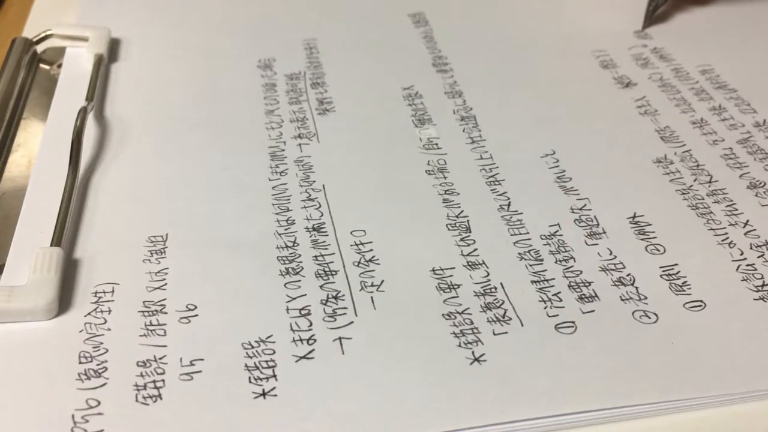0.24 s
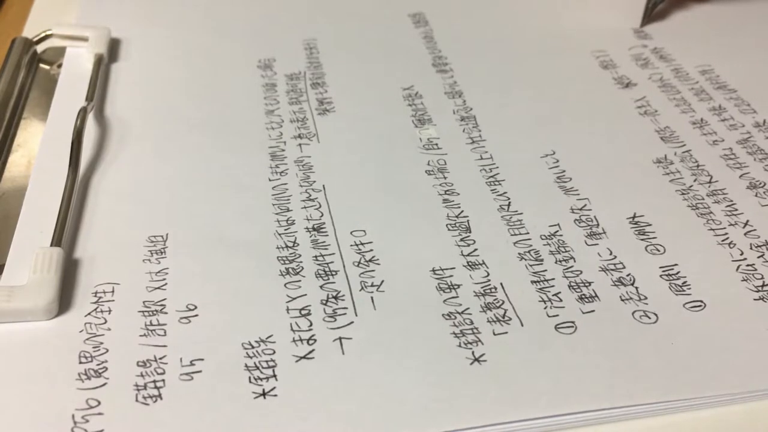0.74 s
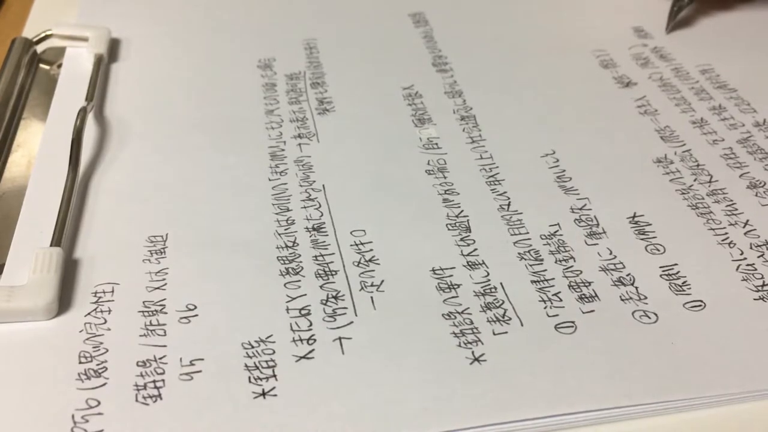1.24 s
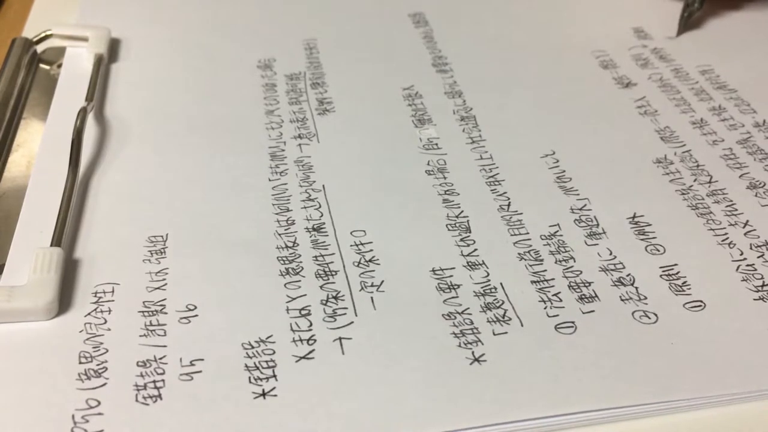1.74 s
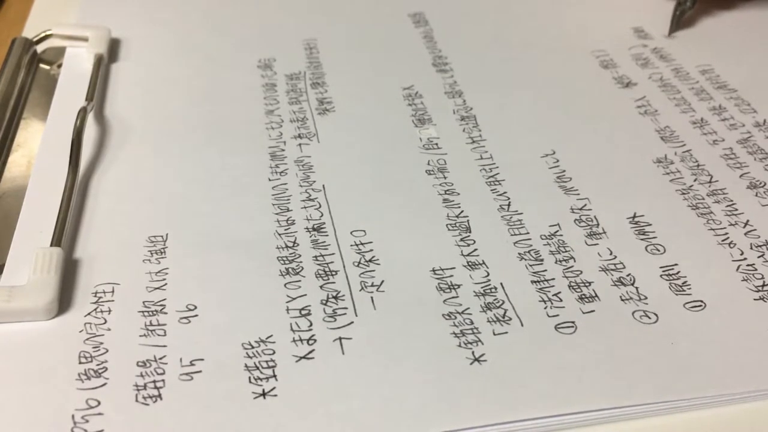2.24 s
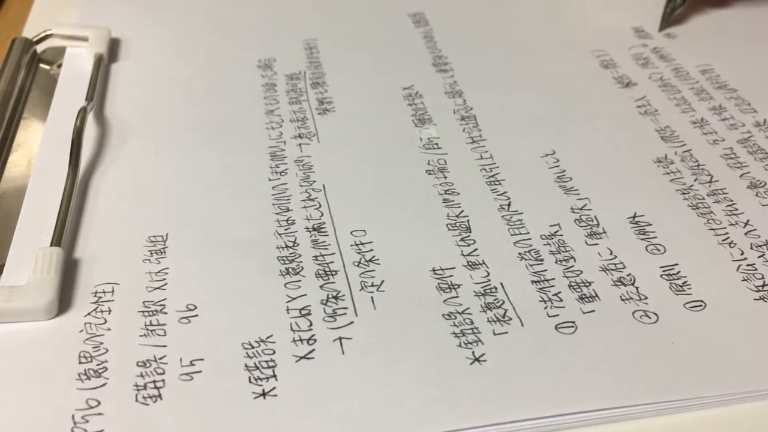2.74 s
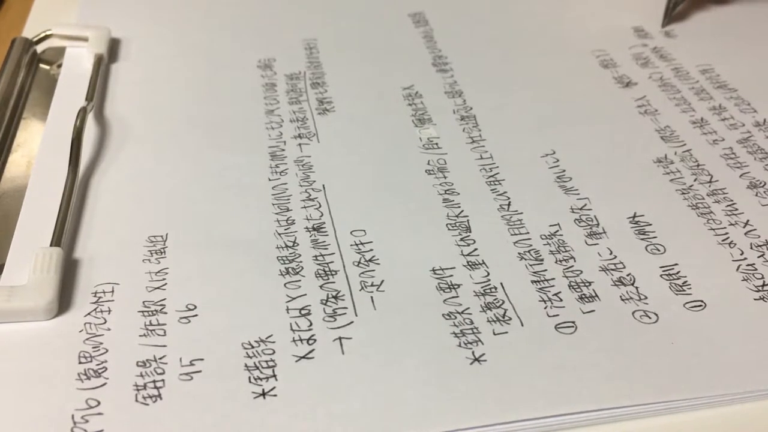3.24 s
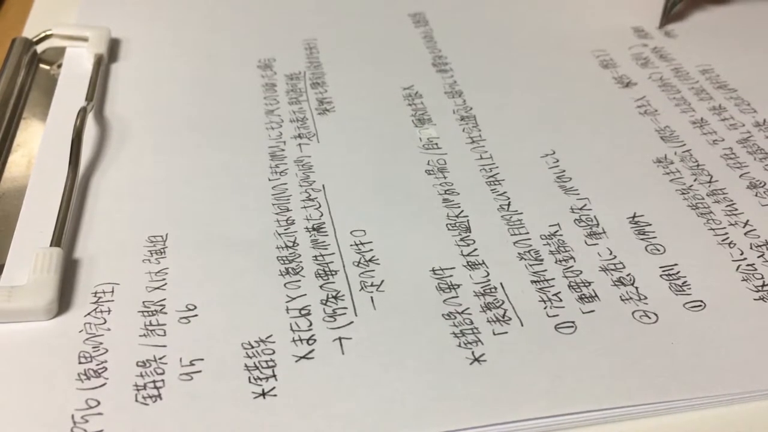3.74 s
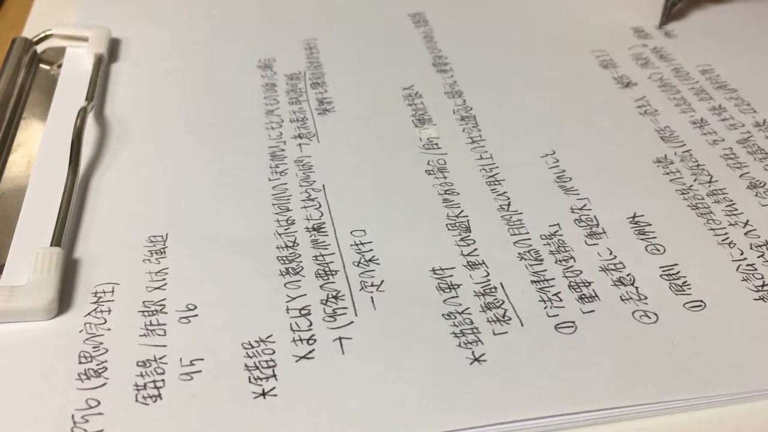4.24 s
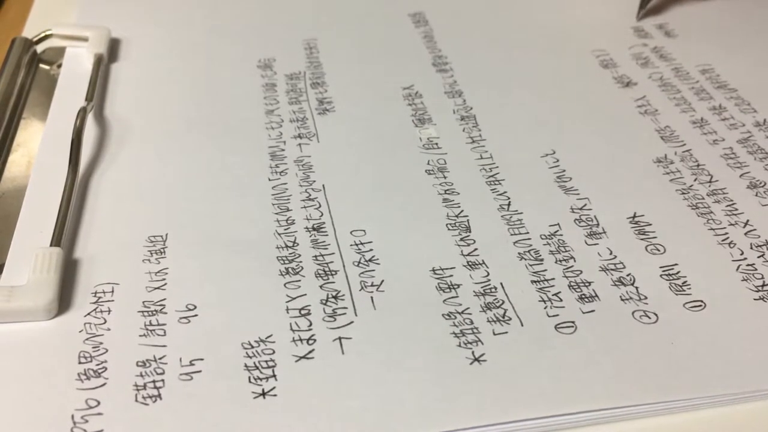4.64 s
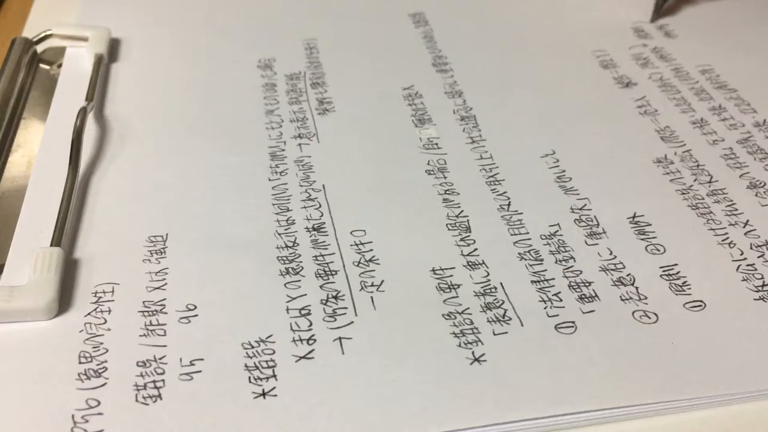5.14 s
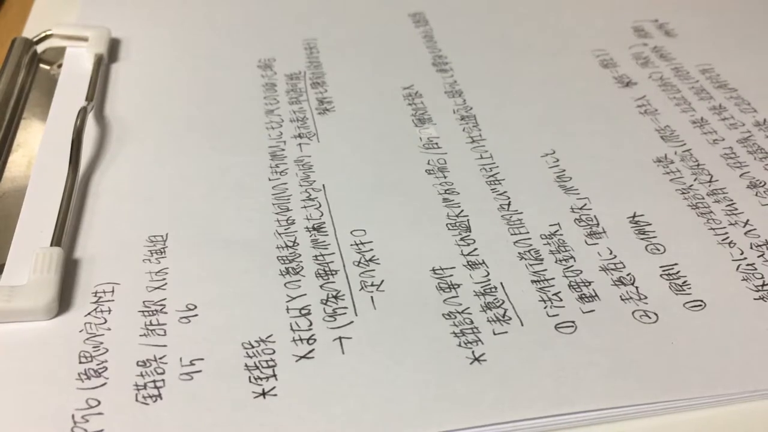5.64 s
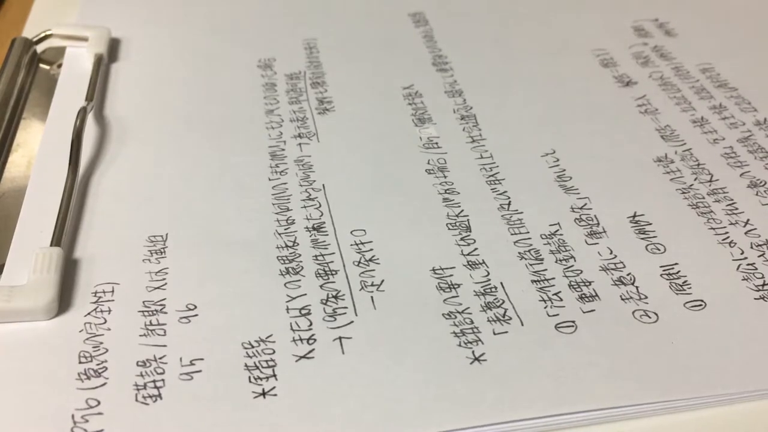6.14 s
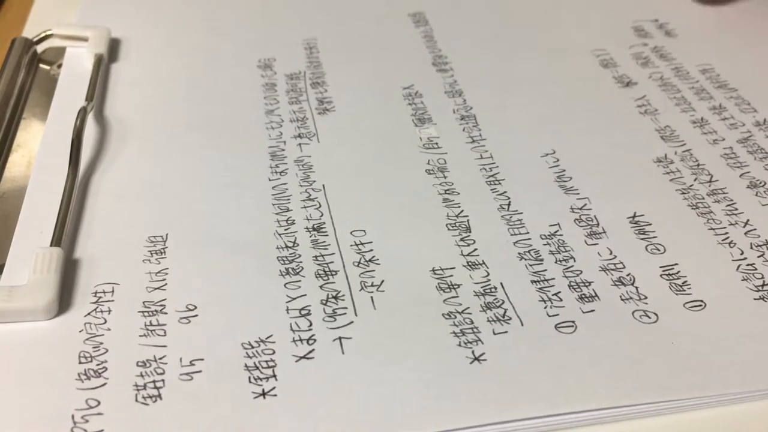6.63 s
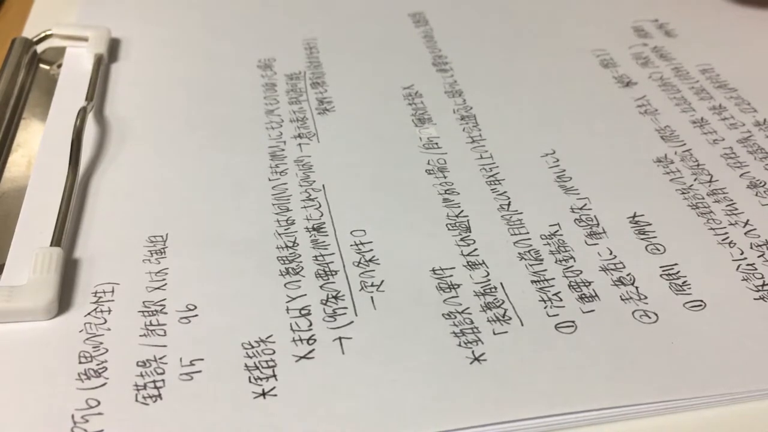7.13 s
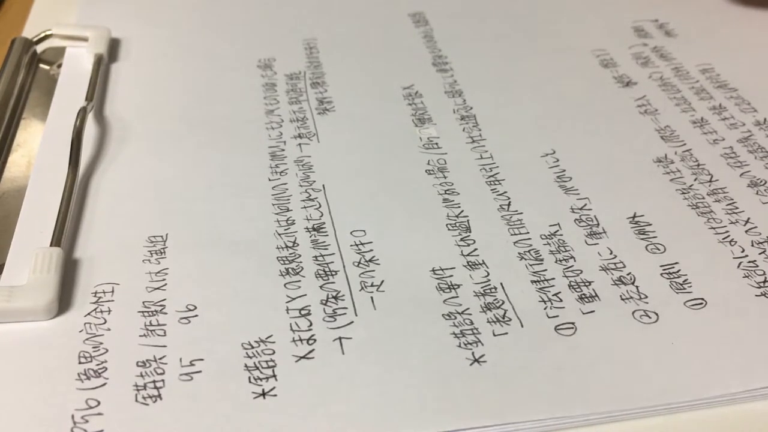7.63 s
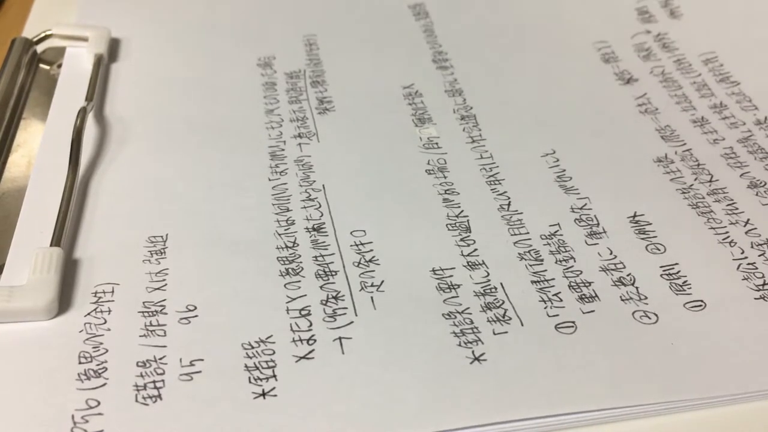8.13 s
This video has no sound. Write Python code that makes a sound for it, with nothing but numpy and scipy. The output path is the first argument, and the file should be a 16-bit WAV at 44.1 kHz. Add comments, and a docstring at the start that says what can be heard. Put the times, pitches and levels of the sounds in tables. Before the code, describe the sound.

From about 0.5 seconds a pen nib writes on a pad of paper in short, soft, dry scratches, roughly three or four a second, with little ticks as it lands. The nib judders very briefly near 1 second and again near 4.9. The writing ends around 5.3 seconds, followed by a few light clicks and faint rubs of a hand on the page until about 6.7. The sheet then starts sliding softly, crackles from around 7.3 and buckles with a sharp snap at about 7.7 seconds, the loudest moment. Sliding and rustling grow stronger through to the end at about 8.4, with smaller snaps near 8.0 and 8.2, a brief edge scrape and faint bumps of the pad on the desk. Everything is close, heard from a small microphone on the desk in a quiet, small room with faint steady hiss and electrical hum.

```python
"""Short, close scratches of a fountain pen on a pad, with little ticks as the nib lands. Then a hand
shifts on the sheet, which slides, rustles, crackles and snaps. A quiet room hisses over a mains hum.
Paper fibres catch and let go, and their tiny slips ring the pad, the nib and the sheet. Twice the tines
judder, sticking and slipping; the snaps are the sheet buckling. It is all heard from a small microphone
lying on the desk, whose reflection notches the treble."""
import sys
import numpy as np
from scipy import signal
from scipy.fft import rfft, irfft, next_fast_len
from scipy.io import wavfile
from scipy.ndimage import uniform_filter1d, map_coordinates

SR = 44100
rng = np.random.default_rng(int(sys.argv[2]) if len(sys.argv) > 2 else 0)


def master(y):
    """Save y as 16-bit WAV."""
    cut = np.clip(np.atleast_2d(y).T, -1, 1)
    pcm = np.round(cut * 32767)  # scale
    wavfile.write(sys.argv[1], SR, pcm.astype(np.int16))


N = 369558

# Strokes pulled along the nib slit, each at its own angle. Each row: start and length in seconds,
# level in dB, then middle ring, upper ring and treble in dB relative to that level.
PULLED_STROKES = [(0.537, 0.072, -49.5, -2, -1.5, -20), (.75, 0.082, -43.5, 0, -0.5, -13),
                  (1.512, 0.09, -49.5, -10, 0.5, -9), (1.739, 0.085, -44, -1.5, 1, -13.5),
                  (2.204, 0.067, -48, -8, -2, -12.5), (2.412, 0.084, -47.5, -9, -3.5, -13),
                  (2.636, 0.064, -52.5, -0.5, 2.5, -11.5), (2.842, .1, -42.5, -1.5, 0, -13),
                  (3.094, 0.05, -55, 1, 1, -8), (3.439, 0.078, -48.5, -12, -1.5, -12.5),
                  (3.617, 0.11, -49, -2, -2, -13), (3.868, .072, -50, 1.5, 1, -12),
                  (4.079, .11, -42, -1.5, 1.5, -12.5), (4.33, 0.058, -52.5, 1.5, 5.5, -6),
                  (4.853, .13, -40.5, -2.5, -1.5, -12), (5.221, 0.062, -47, 0.5, -1, -12)]
# Thinner strokes across the slit. Each row: start and length in seconds, level and treble offset in dB.
SIDE_STROKES = [(.905, 0.16, -50.5, -9.5), (3.155, 0.09, -52, -3), (4.435, 0.11, -49.5, -6)]
# Juddering tines. Each row: start and length in seconds, slips per second, level in dB.
TINE_JUDDERS = [(.9822, .09, 172, -38), (4.9135, .03, 212, -30)]
# The nib landing. Each row: time in seconds, level in dB.
NIB_TICKS = [(0.4883, -44), (0.6942, -41.5), (1.9736, -41.5), (2.8045, -43), (3.8279, -48), (4.036, -46),
             (4.2833, -46), (4.343, -48), (4.572, -50), (5.16, -48), (5.4071, -36.5), (5.499, -39),
             (6.1778, -39), (6.5555, -38), (6.7314, -49)]
# The sheet sliding over the pad. Each row: time in seconds, level and low drag offset in dB.
SLIDE_CURVE = [(6.5, -90, 17), (6.75, -59, -5), (7.0, -56, -10.5), (7.3, -54, -22), (7.5, -58, -3),
               (7.58, -63.5, -33), (7.7, -47.5, -34), (7.8, -46.5, -21), (7.87, -43.5, -40),
               (7.98, -47, -41), (8.05, -43, -46), (8.2, -43.5, -12), (8.31, -34.5, -27),
               (8.38, -40.5, -38)]
# The sheet bending. Each row: start, attack and length in seconds, level and treble offset in dB.
SHEET_RUSTLES = [(6.76, 0.017, 0.072, -56, -7.5), (6.88, .012, 0.045, -52.5, -8),
                 (6.965, .008, 0.027, -60, 1), (7.4, 0.0066, 0.017, -42, -14),
                 (7.45, .006, 0.05, -46.5, -11), (7.503, 0.0069, 0.044, -49.5, -1),
                 (7.533, .008, 0.06, -52.5, 1), (7.599, 0.0045, 0.03, -46, -6),
                 (7.636, 0.013, .03, -41.5, 0), (7.652, 0.007, 0.026, -32, -7.5),
                 (7.875, 0.039, 0.09, -38, -3), (7.993, .003, .077, -34.5, -10),
                 (8.085, 0.028, 0.059, -37, -8.5), (8.187, .004, 0.062, -35.5, -4.5),
                 (8.255, 0.018, 0.048, -38.5, -22), (8.29, .03, 0.059, -33, -15)]
# An edge dragging on the desk. Each row: start and length in seconds, level in dB.
EDGE_SCRAPES = [(8.164, 0.029, -34.5), (8.183, 0.049, -39)]
# The sheet crackling. Each row: time in seconds, body level and treble level in dB.
SHEET_CRACKLES = [(6.981, -36, -52), (7.2805, -41, -43), (7.3272, -35.5, -40), (7.3588, -35.5, -55),
                  (7.3863, -25, -38), (7.4285, -44, -48), (7.4385, -24.5, -51), (7.4462, -27, -48),
                  (7.458, -36, -49), (7.4798, -36, -42), (7.488, -38, -47), (7.8813, -37, -39),
                  (7.995, -31, -40), (8.17, -25, -46), (8.186, -25, -47)]
# The sheet buckling. Each row: time in seconds, level in dB, pitch in Hz, ring time in seconds.
SHEET_SNAPS = [(7.6569, -6, 2533, 0.00342), (7.665, -19, 3280, 0.0032), (8.0323, -15.5, 2500, 0.0029),
               (8.0352, -10.5, 2000, 0.0029), (8.038, -21.5, 2320, 0.0045), (8.202, -23, 2410, 0.0046)]
# The hand shifting on the sheet. Each row: start and length in seconds, level in dB.
HAND_SHIFTS = [(.33, 0.047, -61), (2.02, 0.065, -59), (2.293, 0.04, -55.5), (5.3, 0.05, -56.5),
               (5.47, 0.12, -59.5), (5.92, 0.075, -56.5), (6.22, 0.11, -58), (6.47, 0.11, -62.5),
               (6.59, 0.052, -59), (6.66, 0.02, -46.5)]
# The pad bumping the desk. Each row: time in seconds, level in dB.
PAD_THUDS = [(7.654, -50.5), (8.167, -55), (8.186, -53)]

# Resonances that colour each sound. Each row: centre in Hz, width in Hz, gain in dB.
PAD_MODES = [(377, 60, -6.5), (701.5, 24, 0), (1147, 380, -8.5), (1785, 255, 3.5)]  # the pad under the nib
MIDDLE_MODES = [(2328, 290, -2.5)]  # middle ring of a pulled stroke
NIB_MODES = [(2733, 155, -4), (3200, 118, 0.5), (3420, 1190, -12.5)]  # its upper ring
GLINT_MODES = [(5230, 1850, 3.5), (6530, 490, 10), (8500, 1800, 5), (11800, 2800, 6.5), (12600, 600, 4),
               (14400, 1700, -4)]  # its treble
TINE_MODES = [(1290, 910, 2), (2310, 320, 17), (4140, 950, 1)]  # the nib rubbed sideways
AIRY_MODES = [(5070, 600, -3.5), (7200, 1400, -6.5), (8650, 1800, -7.5), (12100, 2700, -13),
              (14500, 2500, -17)]  # treble of a sideways stroke
PAPER_MODES = [(664, 1200, -17.5), (1680, 980, -6.5), (2376, 493, 2.5), (3890, 1090, -7)]  # body of the sheet
FIBRE_MODES = [(5790, 1280, 3), (8930, 1850, -2.5), (10700, 3400, -6), (15000, 2300, -12)]  # treble of rubbed paper
DRAG_MODES = [(457, 280, -17.5), (1480, 360, -16)]  # low end of the slide
EDGE_MODES = [(558, 130, -0.5), (1230, 200, 0)]  # the scraping edge
DESK_MODES = [(168, 170, -5), (385, 270, -4)]  # the bumped desk

# Tone of the room's hiss. Each row: frequency in Hz, relative spectral density in dB.
HISS_SPECTRUM = [(60, -37), (85, -15.5), (150, -21.5), (237, -15.5), (320, -23.5), (380, -18), (672, -9),
                 (1000, -7), (1600, -6), (2400, -0.5), (3100, -6), (6000, -11), (13000, -18),
                 (16000, -28.5)]
# Tone of its rumble. Each row: frequency in Hz, relative spectral density in dB.
RUMBLE_SPECTRUM = [(20, -18), (32, -9), (42, 21), (52, -10), (66, -27), (72, -56)]
# Hum tones. Each row: frequency in Hz, rms level in dB.
HUM_TONES = [(59.5, -73), (231.5, -93.5), (976, -80)]
# Notches cut by the desk reflection. Each row: centre in Hz, width in Hz, depth from 0 to 1.
DESK_NOTCHES = [(4790, 230, 0.28), (7610, 390, 0.4), (10500, 340, 0.55)]


def pen_strokes():
    """Pulled strokes shake pad and nib, whose treble glints briefly; sideways ones rub the tines."""
    start, length, db, middle_db, ring_db, glint_db = np.transpose(PULLED_STROKES)
    attack, release = 0.016, 0.024 + 0.3 * length
    swell = 150  # pressure keeps growing until the nib lifts
    ring_power, glint_power = 0.85, 1.06  # the upper ring follows pressure gently, the treble steeply
    pad, middle = swells(np.c_[start, length, db, middle_db], attack, release,
                         0.64, 1.64, swell / ring_power)
    nib, = swells(np.c_[start, length, db + ring_db], attack, release, 1.0, 1.95, ring_power * swell)
    glints, = swells(np.c_[start, length, db + glint_db], glint_power * attack, release,
                     glint_power, 2.2 * glint_power, glint_power * swell)
    force = slips(6000, 1.5, 1.3, 180) * amp(0.67 * wobble(60))
    bright = filtered(patchy(force, 2.6), modes(GLINT_MODES))  # rung again below: dark between glints
    dull = filtered(patchy(force, 2.0), lambda hz: 1 / (1 + (hz / 5500) ** 2))
    pulled = resonate(dull, [pad, middle, nib], [PAD_MODES, MIDDLE_MODES, NIB_MODES])
    pulled += resonate(bright, [glints], [GLINT_MODES])
    sideways = swells(SIDE_STROKES, 0.024, 0.064, 0.35, 0.77, swell_db_per_s=84)
    return pulled + resonate(slips(8000, 2.0, 0.68, 170), sideways, [TINE_MODES, AIRY_MODES])


def tine_judder():
    """Almost regular slips pluck the tines, weakening as the nib runs free."""
    plucks, count = np.zeros(N + SR), np.arange(20)
    for start, length, rate, db in TINE_JUDDERS:
        jitter, size = rng.standard_normal((2, 20))
        t = (count + 0.066 * jitter * (count > 0)) / rate
        fade = np.clip(1 - t / length, 0, 1)
        plucks[np.round((start + t) * SR).astype(int)] += amp(db + 2.5 * size) * fade
    tine = modes(TINE_MODES[1:2])  # only the strongest mode rings
    one_pluck = filtered(np.eye(1, N)[0], tine)
    return filtered(plucks[:N], tine) / np.abs(one_pluck).max()


def ticks_and_crackles():
    """Each nib tick or paper crackle is a blow of a millisecond or two on the sheet and the pad."""
    out, t = np.zeros(N + SR), np.arange(2048) / SR
    hz = np.fft.rfftfreq(len(t), 1 / SR)
    body = modes(PAPER_MODES[1:])(hz) + amp(-3.0) * modes(PAD_MODES[3:] + MIDDLE_MODES)(hz)
    treble = modes(FIBRE_MODES)(hz)
    ticks = [(*row, -68) for row in NIB_TICKS]  # only a faint treble on the ticks
    for start, db, treble_db in ticks + SHEET_CRACKLES:
        blow = rfft(t * amp(-60 * t / 0.005) * rng.standard_normal(len(t)))
        low, high = irfft(blow * body), irfft(blow * treble)
        click = amp(db) * low / np.abs(low).max() + amp(treble_db) * high / np.abs(high).max()
        out[round(start * SR):][:len(t)] += click
    return out[:N]


def sheet_moves():
    """The sheet slides evenly, crinkles in clumps when it bends, and drags an edge."""
    times, level_db, drag_db = np.transpose(SLIDE_CURVE)
    slide, drag = (amp(np.interp(np.arange(N) / SR, times, db, left=-150))
                   for db in (level_db, level_db + drag_db))
    friction = patchy(slips(9000, 0.28, 0.84, 40), 0.89)
    sliding = resonate(friction, [slide, slide * amp(-6.5), drag], [PAPER_MODES, FIBRE_MODES, DRAG_MODES])
    crinkle = patchy(slips(4500, 1.3, 2.5, 120), 3.2)
    attacks = np.array(SHEET_RUSTLES)[:, 1]
    bends = swells(np.delete(SHEET_RUSTLES, 1, axis=1), attacks, 0.022, 0.6, 0.74)
    rustling = resonate(crinkle, bends, [PAPER_MODES, FIBRE_MODES])
    scrapes = swells(EDGE_SCRAPES, 0.014, 0.018, 0.97, 1.7)
    return sliding + rustling + resonate(slips(3200, 5.0, 2.4, 77), scrapes, [EDGE_MODES])


def sheet_snaps():
    """A buckle rings for a few cycles until the sheet chokes it; a bright crack leads."""
    out, t = np.zeros(N + SR), np.arange(SR // 50) / SR
    chatter = sum(gain * np.cos(2 * np.pi * hz * t) for hz, gain in [(6200, 1), (4000, 1.7), (10500, 0.096)])
    chatter *= amp(-60 * t / 0.0027)
    for start, db, pitch_hz, ring_s in SHEET_SNAPS:
        choke = np.abs(np.sin(np.pi * np.clip(t / ring_s, 0, 1) ** 0.8)) ** 0.55
        tone = np.sin(2 * np.pi * pitch_hz * t) * choke
        burst = t * rng.standard_normal(len(t)) * amp(-60 * t / 0.0035)
        crack = np.convolve(burst, chatter)[:len(t)]
        crack_db = -12.5 + 0.82 * (db + 19.5)  # louder snaps have more bite
        out[round(start * SR):][:len(t)] += amp(db) * (tone + amp(crack_db) * crack / np.abs(crack).max())
    return filtered(out[:N], lambda hz: (1j * hz / (1300 + 1j * hz)) ** 2)  # a small spot has little body


def hand_rubs():
    """Skin on paper: soft, fine rubs."""
    rub, = swells(HAND_SHIFTS, 0.023, 0.047, 0.72, 0.78)
    return resonate(slips(9000, 2.9, 0.84, 60), [rub, rub * amp(-6.5)], [PAPER_MODES, FIBRE_MODES])


def pad_thuds():
    """Soft bumps of the pad send a low puff through the desk."""
    t, blows = np.arange(SR // 20) / SR, np.zeros(N + SR)
    for start, db in PAD_THUDS:
        puff = t * amp(-60 * t / 0.0097) * rng.standard_normal(len(t))
        blows[round(start * SR):][:len(t)] += amp(db) * unit(puff)
    return filtered(blows[:N], modes(DESK_MODES))


def room_echo(x, decay_s):
    """The small room answers with a short noisy tail."""
    t = np.arange(SR // 3) / SR
    tail = rng.standard_normal(len(t)) * amp(-60 * t / decay_s) * (t > .003)
    return signal.fftconvolve(x, tail / np.linalg.norm(tail))[:N]


def room_tone():
    """A bed of hiss, rumble and mains hum, each wavering slightly."""
    hiss = amp(-61.0 + 1.1 * wobble(5)) * coloured_noise(HISS_SPECTRUM)
    rumble = amp(-73.0 + 0.22 * wobble(1.7)) * coloured_noise(RUMBLE_SPECTRUM)
    t = np.arange(N) / SR
    hum = sum(amp(db + 1.1 * wobble(3.2)) * np.sqrt(2) * np.sin(2 * np.pi * hz * t + 0.68 * wobble(4))
              for hz, db in HUM_TONES)
    return hiss + rumble + hum


def slips(per_s, spread_db, clump_db, clump_rate):
    """Fibres catching and letting go: random impulses of uneven size that come in clumps."""
    when, size, sign = rng.random((3, N))
    hits = (when < per_s / SR) * amp(-spread_db * np.log(size + 0.00092)) * np.sign(sign - .5)
    return hits * amp(clump_db * wobble(clump_rate))


def swells(rows, attack_s, release_s, attack_power, release_power, swell_db_per_s=0):
    """Envelopes from rows of start, length, level, offsets: one for the level and one per dB offset."""
    out, each = np.zeros((len(rows[0]) - 2, N + SR)), np.ones(len(rows))
    for (start, length, db, *offsets_db), rise, fall in zip(rows, attack_s * each, release_s * each):
        t = np.arange(round(length * SR)) / SR
        up, down = (np.sin(np.pi / 2 * np.clip(u, 0, 1)) for u in (t / rise, (length - t) / fall))
        swell = amp(swell_db_per_s * np.minimum(t - length + fall, 0))
        envelope = up ** attack_power * down ** release_power * swell
        out[:, round(start * SR):][:, :len(t)] += amp(db + np.r_[0, offsets_db])[:, None] * envelope
    return out[:, :N]


def patchy(x, depth_db):
    """Random gain patches in time and pitch: a sheet sounds from ever other spots."""
    spectra = signal.stft(x, nperseg=256)[2]
    patches = uniform_filter1d(rng.standard_normal(spectra.shape), size=6, axis=0)
    patches = uniform_filter1d(patches, size=8, axis=1)
    return signal.istft(spectra * amp(depth_db * unit(patches)), nperseg=256)[1][:N]


def resonate(force, envelopes, bodies):
    """One force rings several bodies, each under its own envelope."""
    return sum(gain * unit(filtered(force, modes(body))) for gain, body in zip(envelopes, bodies))


def modes(table):
    """A body's response: neighbouring resonances alternate in sign."""
    return lambda hz: sum((-1) ** k * amp(db) * resonance(hz, centre, width)
                          for k, (centre, width, db) in enumerate(table))


def resonance(hz, centre_hz, width_hz):
    """One causal resonance of gain 1."""
    return 1j * hz * width_hz / (centre_hz ** 2 - hz ** 2 + 1j * hz * width_hz)


def coloured_noise(spectrum):
    """Noise at unit rms, shaped by an EQ curve on a log frequency axis."""
    points_hz, db = np.transpose(spectrum)
    curve = lambda hz: amp(np.interp(np.log(hz + 1), np.log(points_hz), db))
    return unit(filtered(rng.standard_normal(N), curve))


def filtered(x, response):
    """x through a complex frequency response."""
    size = next_fast_len(N + SR // 4)
    return irfft(rfft(x, size) * response(np.fft.rfftfreq(size, 1 / SR)), size)[:N]


def wobble(rate):
    """A smooth random curve, rate knots a second."""
    return map_coordinates(rng.standard_normal(int(N * rate / SR) + 4), [np.arange(N) * rate / SR])


def amp(db):
    return 10 ** (np.asarray(db) / 20)


def unit(x):
    return x / np.sqrt(np.mean(x ** 2) + 1e-20)


def scene():
    """Pen and paper up close, with a touch of echo, over desk thuds and room tone."""
    near = pen_strokes() + tine_judder() + hand_rubs() + sheet_moves()
    near = near + ticks_and_crackles() + sheet_snaps()
    # thin paper radiates no bass; the top octave is shadowed
    near = filtered(near, lambda hz: (1j * hz / (700 + 1j * hz)) ** 3 / (1 + (hz / 13500) ** 6))
    return (amp(0.5) * near + amp(-14.5) * room_echo(near, decay_s=0.27) + pad_thuds() + room_tone())[None]


def record(dry):
    """The reflection off the desk cuts notches; nothing passes above the band limit."""
    top_hz = 15830
    desk = lambda hz: np.prod([1 - depth * resonance(hz, centre, width)
                               for centre, width, depth in DESK_NOTCHES], axis=0)
    return filtered(dry[0], lambda hz: desk(hz) * (hz < top_hz))[None]


dry = scene()
out = record(dry)
master(out)
```